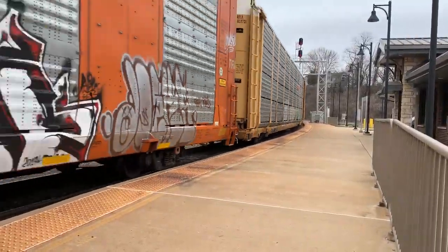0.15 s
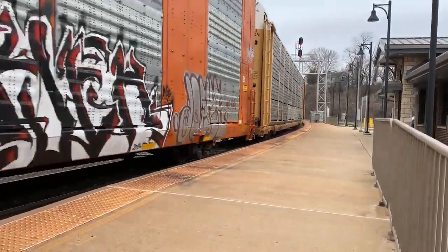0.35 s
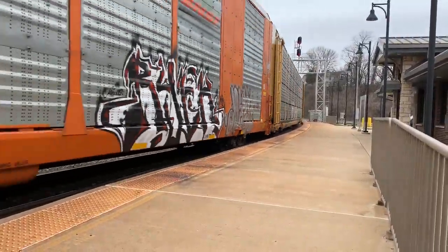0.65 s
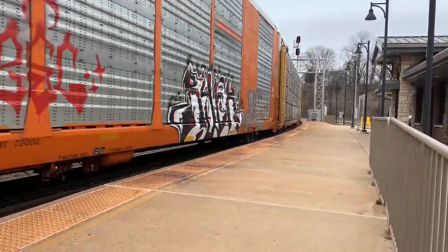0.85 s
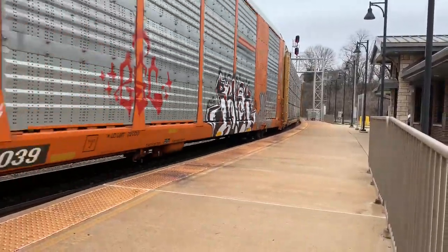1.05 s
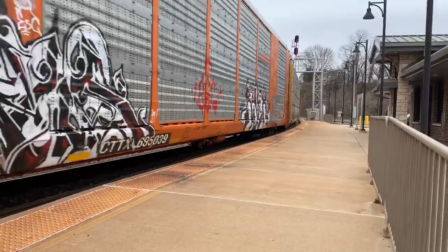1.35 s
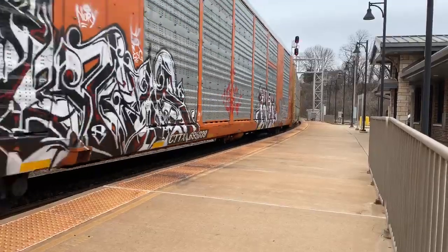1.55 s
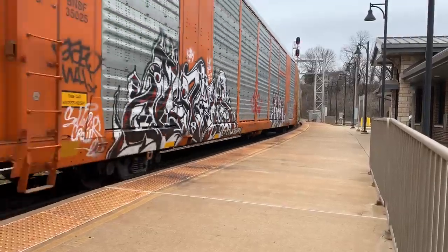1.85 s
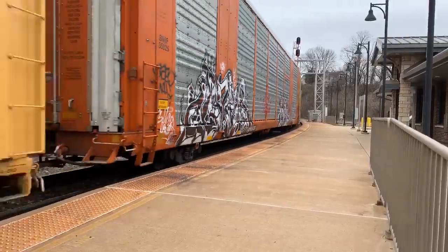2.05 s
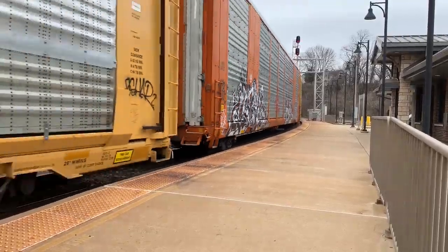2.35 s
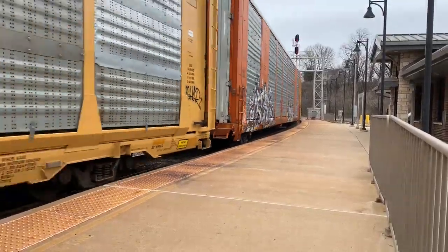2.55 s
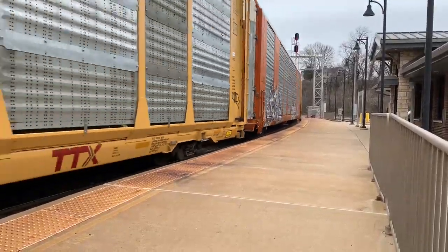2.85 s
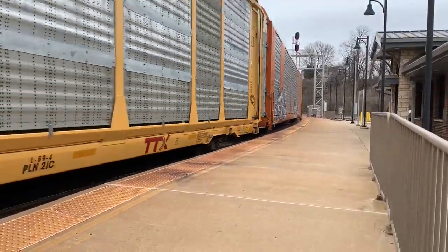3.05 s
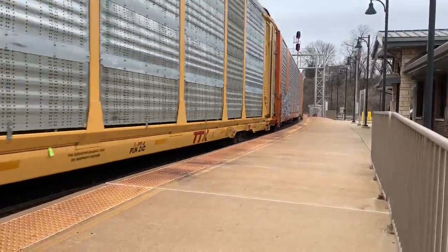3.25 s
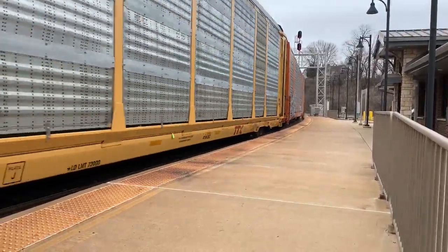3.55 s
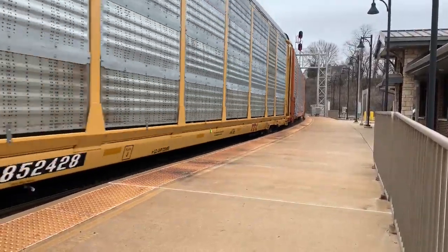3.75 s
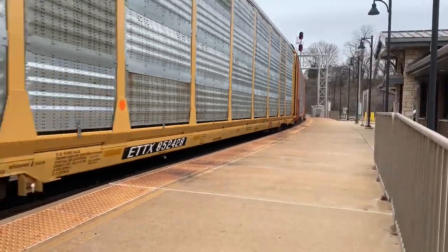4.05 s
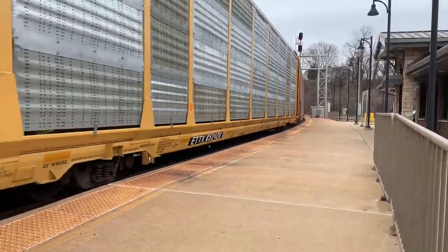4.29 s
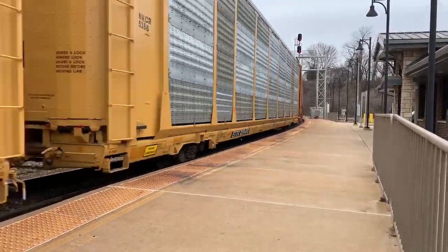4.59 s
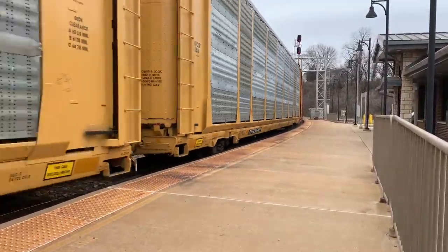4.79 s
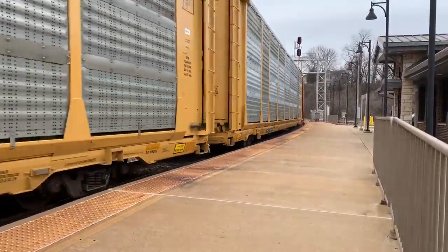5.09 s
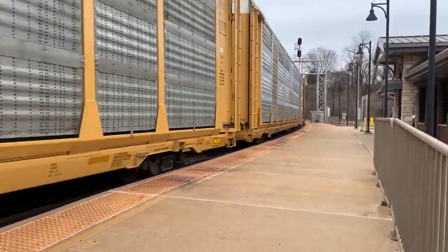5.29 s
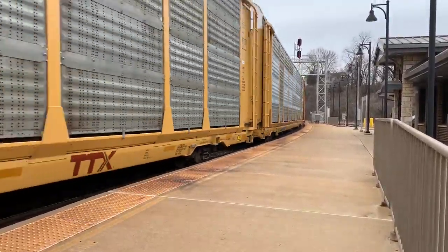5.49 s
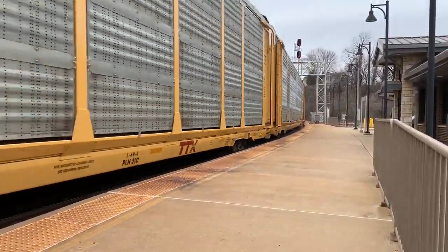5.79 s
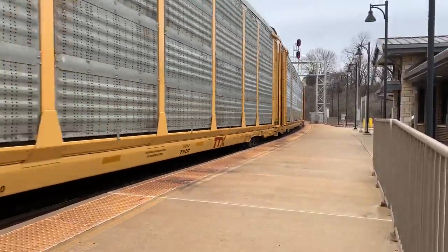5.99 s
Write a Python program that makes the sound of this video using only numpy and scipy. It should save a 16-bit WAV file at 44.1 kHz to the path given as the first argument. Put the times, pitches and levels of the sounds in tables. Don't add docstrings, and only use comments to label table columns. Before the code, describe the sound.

A heavy freight train is already rolling past a platform, close to a stereo phone microphone outdoors. Deep rumble, hollow wagon-body drone and gritty steel tread roar continue to the end at about 6.1 seconds, wavering in strength, with fine bright flange hiss above. A long, slightly distant clack swells at 0.45. A faint wheel squeal sounds around 0.8 to 1.2, over a thin, very high whistle lasting until about 3.5. At 1.93 a heavy double clack thuds and rattles as the roar rises; a long lighter rattle follows at 2.8. A short heavy thud lands at 3.4, a dull blow at 3.7. The loudest clack hits at 4.15, a second wheel following at once, steel ringing on, then a short knock at 4.5. Shrill high tones linger. Late double clacks at 5.5 bring a hiss surge, grinding squeal and brief twin-toned squeaks as the train keeps rolling.

```python
import sys
import numpy as np
from scipy import signal
from scipy.fft import rfft, irfft, next_fast_len
from scipy.io import wavfile
from scipy.ndimage import uniform_filter1d, map_coordinates

SR = 44100
rng = np.random.default_rng(int(sys.argv[2]) if len(sys.argv) > 2 else 0)


def dump(signal):
    limited = np.clip(np.atleast_2d(signal).T, -1, 1)
    pcm = np.round(limited * 32767).astype(np.int16)
    wavfile.write(sys.argv[1], SR, pcm)


def amplitude_ratio(level_db):
    exponent = np.asarray(level_db, float) / 20
    return 10 ** exponent


N = 270333

# time in seconds, pressure in dB.
FLANGE_PRESSURE = [(0.0, -29), (0.01, -37.5), (0.87, -34.5), (0.99, -31.5), (1.38, -42.5), (2.0, -38.5),
                   (2.05, -43), (3.06, -40), (3.26, -47), (3.46, -33), (3.7, -40), (4.15, -41.5),
                   (4.17, -32.5), (4.64, -41), (5.39, -36.5), (5.46, -28), (5.98, -37), (6.13, -43)]
NEAR_RISE_S, FAR_RISE_S = 0.0045, 0.022


def unit(x):
    return x / np.sqrt(np.mean(x ** 2) + 1e-20)


def along(points, hz):
    f, v = np.transpose(points)
    return np.interp(np.log(hz + 1), np.log(f + 1), v)


def curves(rows):
    s, *cols = np.transpose(rows)
    return [np.interp(np.arange(N) / SR, s, c) for c in cols]


def wobble(rate):
    knots = rng.standard_normal(int(N * rate / SR) + 4)
    return map_coordinates(knots, [np.arange(N) * rate / SR])


def patches(rows):
    t = np.arange(N) / SR
    steps_db = sum(db * ((t > s) & (t < s + length)) for s, length, db in rows)
    return uniform_filter1d(steps_db, size=1500)


def filtered(x, response):
    m = next_fast_len(N + SR // 2, real=True)
    return irfft(rfft(x, m) * response(np.fft.rfftfreq(m, 1 / SR)), m)[..., :N]


def rush(spectrum, patchy_db):
    z = signal.stft(rng.standard_normal((2, N)), nperseg=512)[2]
    field = uniform_filter1d(rng.standard_normal(z.shape[1:]), size=4, axis=0)
    field = uniform_filter1d(field, size=12, axis=1)
    pair = signal.istft(z * amplitude_ratio(patchy_db * unit(field)), nperseg=512)[1][:, :N]
    return unit(filtered(pair, lambda hz: amplitude_ratio(along(spectrum, hz))))


def fuzzy_line(hz, width_hz, n):
    m = next_fast_len(n // 2 + 2000, real=True) * 2
    offset = np.fft.rfftfreq(m, 1 / SR) - hz
    noise = rfft(rng.standard_normal((2, m)))
    return unit(irfft(noise / (1 + (2 * offset / width_hz) ** 2), m)[:, :n])


def rolling():
    # time in seconds, rolling strength in dB, softness of the ballast under the train in dB.
    roll = [(0.0, -27, -1.5), (0.41, -26.5, -1), (0.73, -27.5, 0.5), (1.84, -26.5, -1), (2.06, -22.5, 0.5),
            (2.75, -29, 0.5), (2.94, -33, 3), (3.09, -26, 1), (3.26, -28, 0.5), (3.64, -26.5, 0),
            (4.08, -23.5, 0), (5.36, -29.5, 1.5), (5.67, -24.5, 1), (6.01, -28.5, 1.5), (6.13, -25.5, 3)]
    # frequency in Hz, level in dB per Hz.
    deep_colour = [(22, -40), (35, -10), (55, 3.5), (87, 2.5), (130, 2), (190, -7), (300, -45.5)]
    body_colour = [(100, -30), (170, -2), (300, 1), (450, -5.5), (650, -13), (950, -15), (1300, -27),
                   (2500, -54)]
    tread_colour = [(700, -51), (1200, -3), (1800, -2), (2100, -7), (2600, 0), (3200, -6), (4500, -9),
                    (6500, -14), (8500, -28), (11000, -46)]
    # start in seconds, length in seconds, change in dB.
    worn_rail = [(.05, 0.39, -1.5), (.68, 0.15, 2), (1.05, 0.087, 2.5), (1.25, 0.23, 0.5),
                 (1.76, 0.15, 3.5), (2.2, 0.32, 4), (2.62, .15, 0.5), (3.36, 0.14, -4), (3.78, 0.37, 1.5),
                 (5.2, 0.22, 0), (5.9, 0.28, 3)]
    strength_db, soft_db = curves(roll)
    pressure_db, = curves(FLANGE_PRESSURE)
    swing_db = strength_db - strength_db.mean()
    press_swing_db = pressure_db - pressure_db.mean()

    deep_db = -27.5 + 0.3 * swing_db + soft_db
    body_db = strength_db + 2
    tread_db = -40.5 + 0.61 * swing_db + 0.27 * press_swing_db + patches(worn_rail)

    lurch = wobble(7)
    deep = amplitude_ratio(deep_db + 0.58 * lurch + 2.9 * wobble(15)) * rush(deep_colour, patchy_db=-1.0)
    body = amplitude_ratio(body_db + 0.47 * lurch + 0.56 * wobble(30)) * rush(body_colour, patchy_db=1.55)
    tread = amplitude_ratio(tread_db + 1.5 * wobble(12)) * rush(tread_colour, patchy_db=2.5)
    return deep + body + tread


def shakes(rows, fizz_db, rise):
    power, t = np.zeros((4, N + SR)), np.arange(SR) / SR
    t60_share = np.array([[1.5], [1.4], [1.01], [0.8]])
    for s, thud_db, knock_db, clatter_db, t60 in rows:
        fall_db = 60 * t / (t60 * t60_share)
        start_db = np.c_[[thud_db, knock_db, clatter_db, clatter_db + fizz_db]]
        blow = amplitude_ratio(start_db - fall_db) * (1 - np.exp(-t / rise))
        power[:, round(s * SR):][:, :SR] += blow ** 2
    return power[:, :N]


def wheel_ring(x):
    # frequency in Hz, level in dB, time to fall 60 dB in seconds.
    wheel_modes = [(1846, 0, 0.41), (1900, -7, 0.42), (2175, -10, 0.53), (2568, -2, 1.1), (2719, -1, 0.62),
                   (2998, -15, 0.65), (4323, -9, 0.33), (4802, -13, 0.48), (5916, -19, 0.91),
                   (6444, -18, 0.54), (6971, -11, 0.21), (7354, -19, 0.49)]

    def mode(f, centre, width):
        return 1j * f * np.sqrt(width) / (centre * centre - f * f + 1j * f * width)

    def response(f):
        return sum(amplitude_ratio(db) * mode(f, hz, np.log(1000) / np.pi / t60) for hz, db, t60 in wheel_modes)

    return filtered(x, response)


def joints():
    # start in seconds, thud in dB, knock in dB,
    # clatter in dB, time to fall 60 dB in seconds.
    near_blows = [
        (1.929, -17.5, -18, -21.5, .5),
        (2.02, -16, -24, -43, 0.55),
        (2.79, -48, -32.5, -36.5, 1),
        (3.412, -11.5, -40, -53, .15),
        (3.468, -31, -40, -35.5, 0.65),
        (4.144, -15.5, -13.5, -15.5, 0.42),
        (4.22, -15, -25, -33.5, 0.64),
        (4.49, -20, -23, -45, 0.12),
    ]
    far_blows = [
        (.445, -22.5, -19, -29, 0.92),
        (.6, -47, -26.5, -37, 0.45),
        (1.94, -11, -17.5, -24, 0.56),
        (2.865, -19, -17, -27, 0.81),
        (2.97, -17.5, -39, -25, 0.44),
        (3.72, -23, -31, -46, .3),
        (5.485, -14.5, -17, -27.5, 0.66),
        (5.58, -16, -28, -30.5, 0.54),
    ]
    # frequency in Hz, level in dB per Hz.
    thud_colour = [(25, -30), (55, -5), (100, 3), (170, 0.5), (280, -12.5), (500, -52)]
    knock_colour = [(120, -40), (250, -1), (450, 0), (700, -3.5), (1050, -7), (1600, -15), (2800, -40)]
    clatter_colour = [(800, -40), (1300, -3), (1800, 0), (2700, -3), (4300, -10), (5500, -30)]
    fizz_colour = [(2500, -10), (4500, 6.5), (7000, -1), (10000, -4), (13000, -9), (16000, -30)]
    near = shakes(near_blows, fizz_db=-8.5, rise=NEAR_RISE_S)
    far = shakes(far_blows, fizz_db=-7, rise=FAR_RISE_S)
    thud, knock, clatter, fizz = np.sqrt(near + far)

    rattle = amplitude_ratio(1.8 * wobble(160))
    clatter = clatter * rattle * rush(clatter_colour, patchy_db=1.1)
    ring = amplitude_ratio(10) * wheel_ring(clatter)
    fizz = fizz * rattle * rush(fizz_colour, patchy_db=0.0)
    thud = thud * rush(thud_colour, patchy_db=-0.5)
    knock = knock * rattle * rush(knock_colour, patchy_db=1.23)
    return clatter + ring + fizz + thud + knock


def rings():
    # start in seconds, frequency in Hz, width in Hz, level in dB, time to fall 60 dB in seconds.
    struck_modes = [
        (3.27, 2710, 120, -34, .3),
        (3.49, 2560, 60, -39, .9),
        (4.15, 1790, 160, -27, .5),
        (4.155, 4250, 250, -28, .35),
        (4.2, 2570, 70, -28, .65),
        (4.19, 2717, 20, -35, .7),
        (4.49, 4850, 90, -43, .9),
    ]
    out, t = np.zeros((2, N + SR)), np.arange(SR // 2) / SR
    for s, hz, width_hz, db, t60 in struck_modes:
        fade = amplitude_ratio(db - 60 * t / t60) * (1 - np.exp(-t / NEAR_RISE_S))
        out[:, round(s * SR):][:, :len(t)] += fade * fuzzy_line(hz, width_hz, len(t))
    return out[:, :N]


def flanges():
    # frequency in Hz, level in dB per Hz.
    low_colour = [(6000, -13.5), (8000, -11.5), (10000, -3.5), (11500, 2), (12500, 2), (13500, -18)]
    top_colour = [(11500, -18.5), (12500, -3), (13400, 2), (14600, -2.5), (15700, 0), (16500, -3.5)]
    # start in seconds, length in seconds, change in dB.
    dry_rail = [
        (.4, 0.086, -10),
        (.52, .17, 4.5),
        (.76, .2, -4),
        (1.56, .5, 1),
        (3.05, 0.17, -1),
        (3.8, 0.61, 2),
        (4.94, 0.85, 4),
        (5.953, 0.081, 6),
        (6.02, 0.13, -4),
    ]
    pressure_db, = curves(FLANGE_PRESSURE)
    top_db = -32 + 0.3 * (pressure_db - pressure_db.mean()) + patches(dry_rail)
    top = amplitude_ratio(top_db) * rush(top_colour, patchy_db=1.5)
    low = amplitude_ratio(pressure_db + 0.5) * rush(low_colour, patchy_db=1.5)
    return amplitude_ratio(0.57 * wobble(14) + 0.23 * wobble(110)) * (top + low)


def squeals_and_booms():
    # frequency in Hz, width in Hz, level in dB.
    rim = [(2320, 80, -6), (2680, 90, 2), (3860, 100, -1), (4800, 900, 0), (6390, 160, -4), (7560, 130, -6)]
    whistle = [(15531, 20, 0)]
    shrill = [(13941, 14, -4), (13900, 700, 0)]
    grind = [(3591, 60, -6), (5850, 90, -12), (7306, 20, -8), (7870, 16, -2), (8064, 16, -1),
             (8000, 700, 3), (11596, 30, -7), (12680, 24, -1), (13943, 14, 3), (14073, 24, -3)]
    twin = [(4601, 22, -1), (4714, 22, -1), (4660, 200, 0)]
    # start in seconds, length in seconds, level in dB.
    rim_spells = [
        (.77, .48, -45.5),
        (0.921, .3, -54.5),
        (2.3, 0.22, -53),
        (3.55, 0.56, -54.5),
    ]
    whistle_spells = [
        (0, .4, -44),
        (.28, 0.49, -38),
        (.65, 0.78, -47.5),
        (1.2, 1.4, -45),
        (2.05, 1.5, -40.5),
    ]
    shrill_spells = [
        (3.55, 0.82, -42),
        (4.2, .6, -39),
        (4.55, 0.87, -38),
        (5.3, 1.0, -48),
    ]
    grind_spells = [
        (5.36, 0.98, -44),
    ]
    twin_spells = [
        (5.57, .12, -43),
        (5.73, .41, -41),
    ]
    # start and end in seconds, frequency in Hz, width in Hz, level in dB.
    booms = [(.45, .62, 150, 28, -27.5), (1.298, 1.6, 287, 68, -30.5), (1.395, 1.6, 68, 10, -33),
             (2.103, 2.3, 114, 14, -36), (2.72, 3.0, 750, 200, -45), (3.001, 3.25, 82, 11, -33.5),
             (3.302, 3.5, 74, 8.8, -28.5), (3.682, 3.82, 69.6, 14, -24.5), (3.904, 4.05, 80, 18, -26.5),
             (4.5, 5.35, 282, 79, -31.5), (5.654, 5.95, 67.4, 10, -37.5)]
    strays = [(.1, .8, 12980, 80, -41), (.92, 1.11, 11350, 300, -38), (1.04, 1.17, 600, 400, -33),
              (1.17, 1.3, 9990, 80, -47), (1.45, 1.95, 14180, 20, -48), (2.05, 2.55, 6430, 160, -50),
              (2.7, 3.2, 14180, 20, -48), (3.26, 3.33, 10060, 200, -47), (3.27, 3.34, 4200, 1500, -45),
              (3.6, 4.2, 11350, 60, -50), (3.85, 4.05, 11620, 80, -44), (3.9, 4.02, 1800, 500, -41),
              (5.39, 5.6, 6000, 3000, -36), (5.4, 5.75, 7300, 900, -42)]
    wheels = [(rim, rim_spells), (whistle, whistle_spells), (shrill, shrill_spells),
              (grind, grind_spells), (twin, twin_spells)]
    held = []
    for modes, spells in wheels:
        for s, length, db in spells:
            held += [(s, s + length, hz, width_hz, db + mode_db) for hz, width_hz, mode_db in modes]

    out = np.zeros((2, N + 3 * SR))
    for start, end, hz, width_hz, db in booms + strays + held:
        n = round((end - start) * SR)
        fade = amplitude_ratio(db) * signal.windows.tukey(n, 0.45)
        out[:, round(start * SR):][:, :n] += fade * fuzzy_line(hz, width_hz, n)
    return amplitude_ratio(3.15 + 0.61 * wobble(12)) * out[:, :N]


def ports(paths):
    # frequency in Hz, share of the sound common to both ports from 0 to 1.
    alike = [(40, 1), (200, 0.76), (500, 0.81), (900, 0.4), (2000, 0.68), (3600, 0.28), (5800, 0.13),
             (7000, 0.48), (8000, 0.9), (16000, 1)]
    # frequency in Hz, left minus right in dB.
    lean = [(60, -1), (200, 1.5), (500, 2.5), (900, 3.5), (1300, 0.5), (3000, -0.5), (6000, -2), (8000, 0)]
    # frequency in Hz, phase by which left leads in radians.
    lead = [(0, 0), (4500, 12.6), (6000, 6.28), (15600, -6.28), (22050, -14.7)]

    def split(hz):
        turn = np.arccos(np.clip(along(alike, hz), 0, 1)) / 2
        return np.array([np.cos(turn), np.sin(turn)])

    def tilt(hz):
        half = amplitude_ratio(along(lean, hz) / 2) * np.exp(0.5j * np.interp(hz, *np.transpose(lead)))
        return np.array([half, 1 / half])

    direct, scattered = filtered(paths, split)
    return filtered(np.array([direct + scattered, direct - scattered]), tilt)


def scene():
    return ports(rolling() + joints() + rings() + flanges() + squeals_and_booms())


def top_cut(x):
    return signal.sosfilt(signal.butter(12, 17110, fs=SR, output="sos"), x)


def record(dry):
    mix = dry / (1 + np.abs(dry / 0.9) ** 8) ** (1 / 8)
    return top_cut(mix)


dry = scene()
out = record(dry)
dump(out)
```